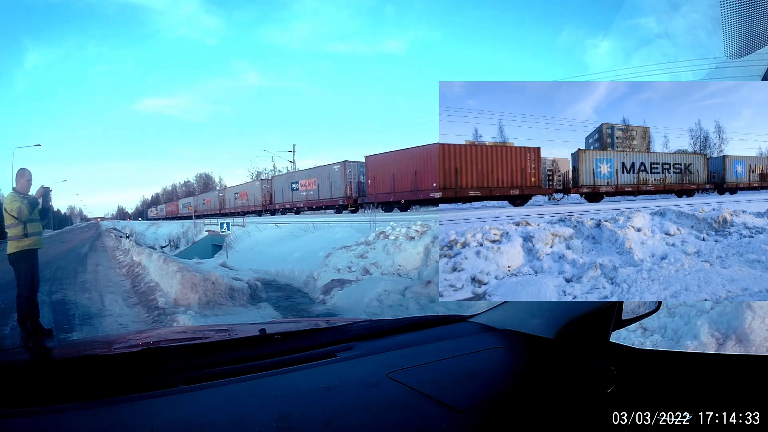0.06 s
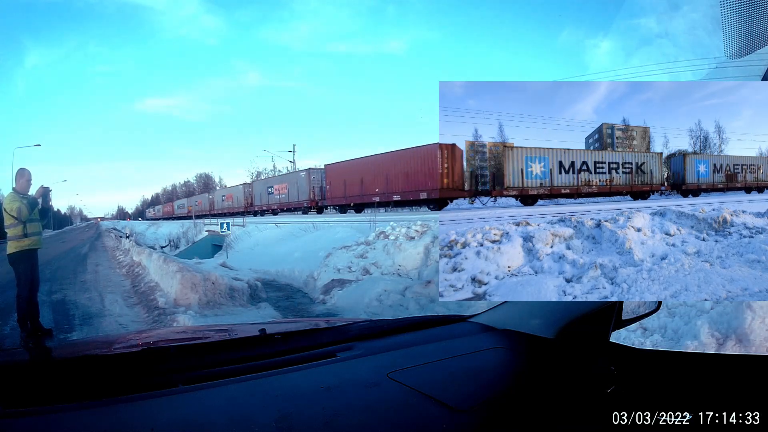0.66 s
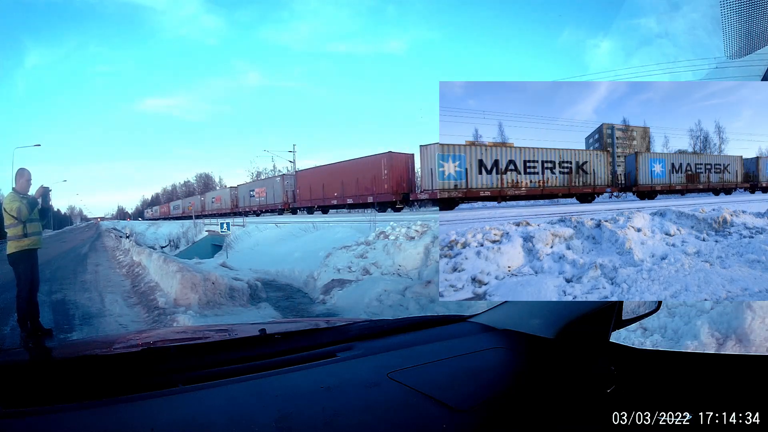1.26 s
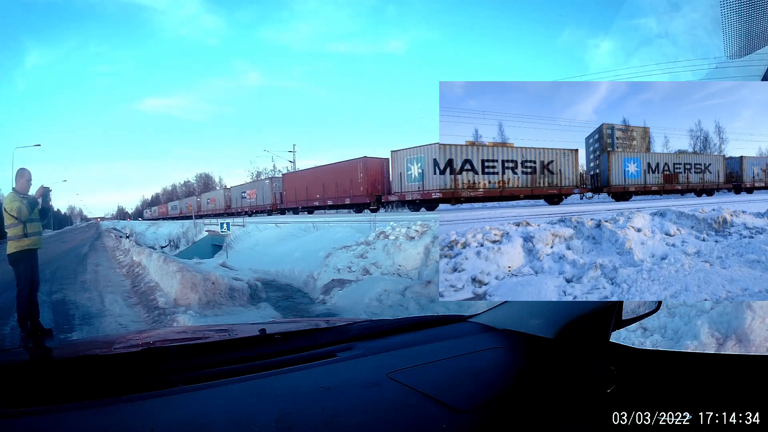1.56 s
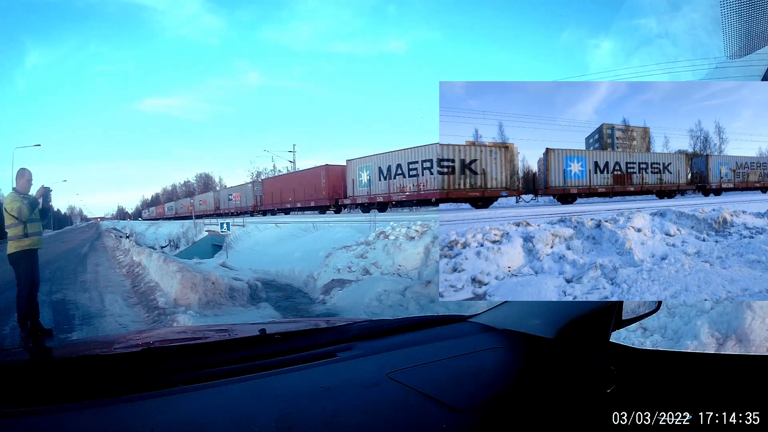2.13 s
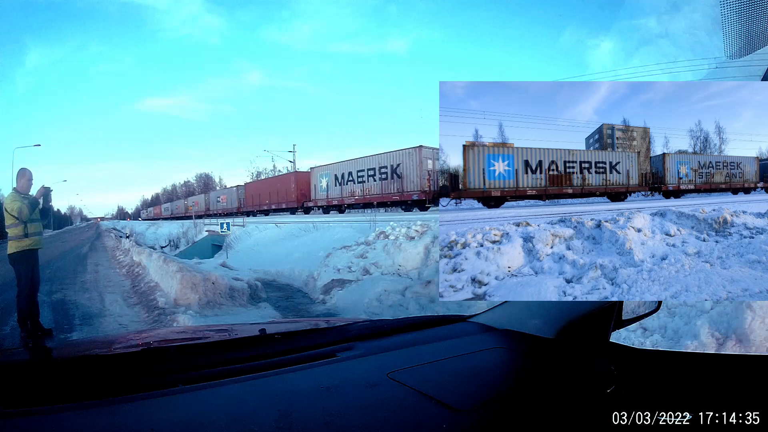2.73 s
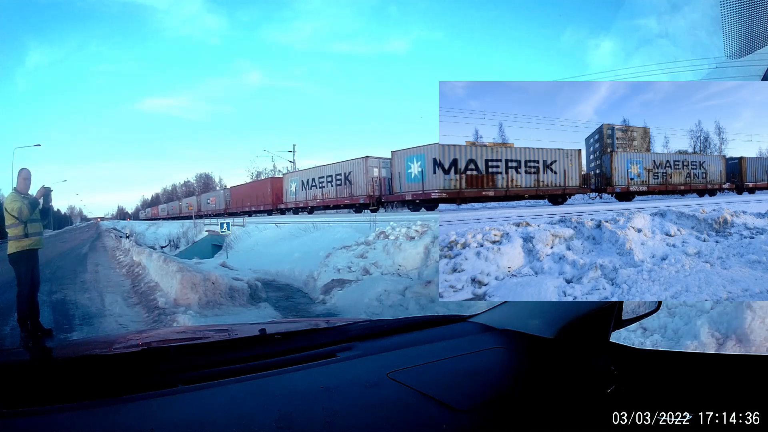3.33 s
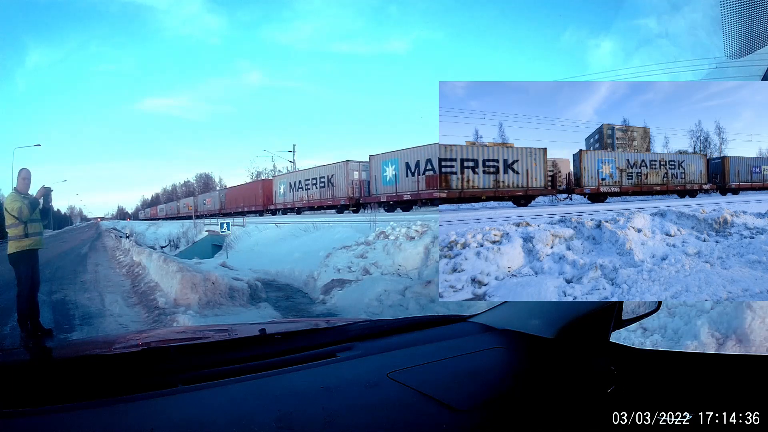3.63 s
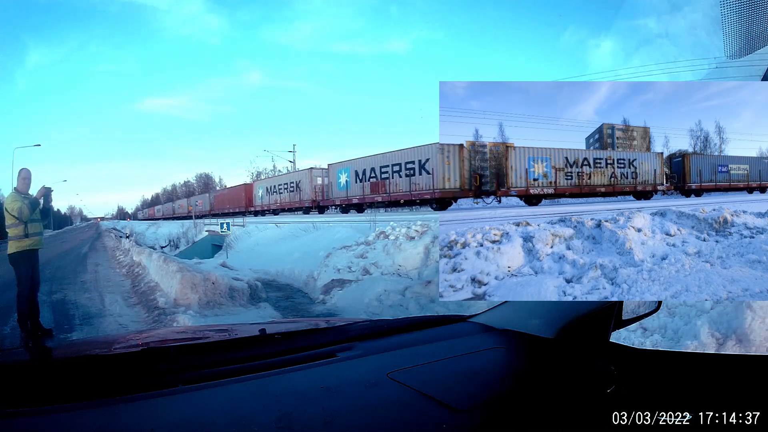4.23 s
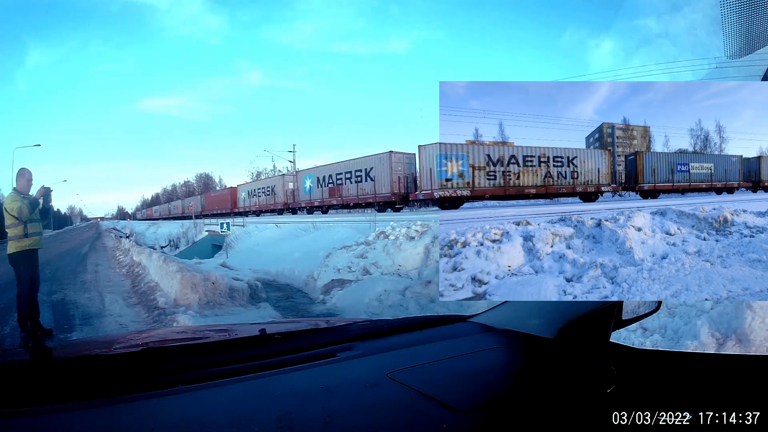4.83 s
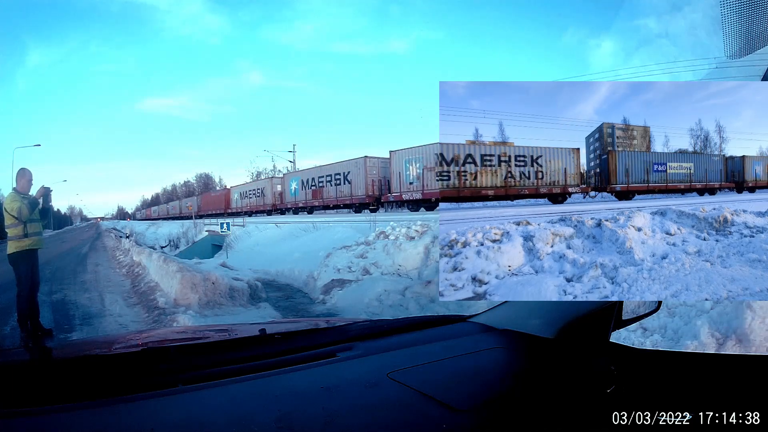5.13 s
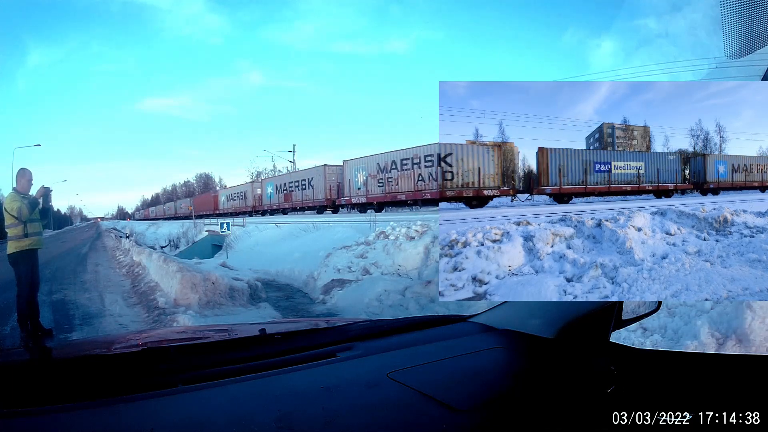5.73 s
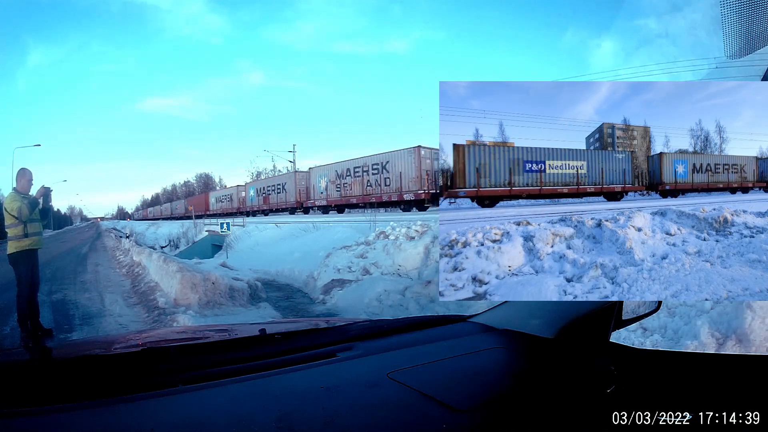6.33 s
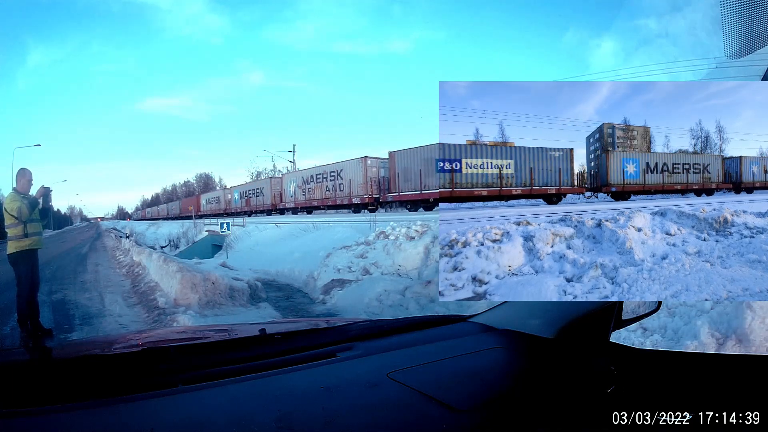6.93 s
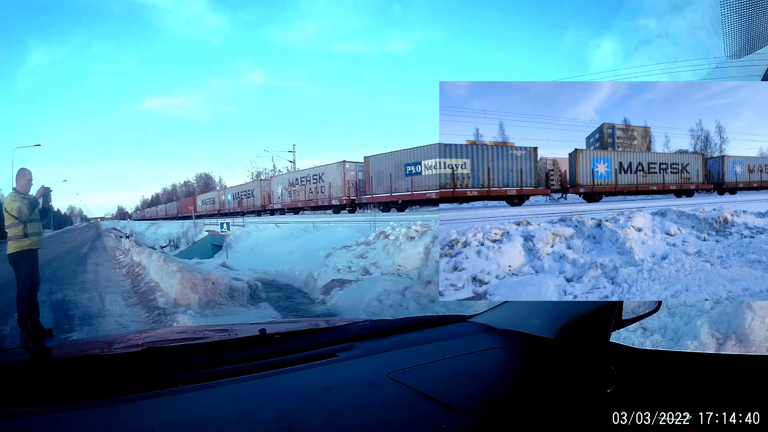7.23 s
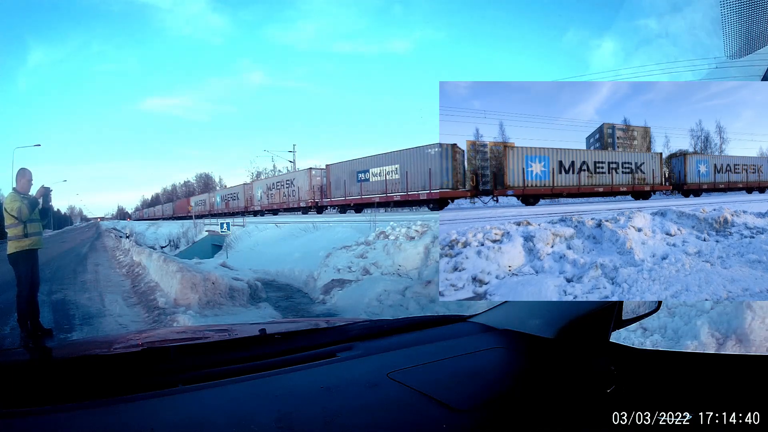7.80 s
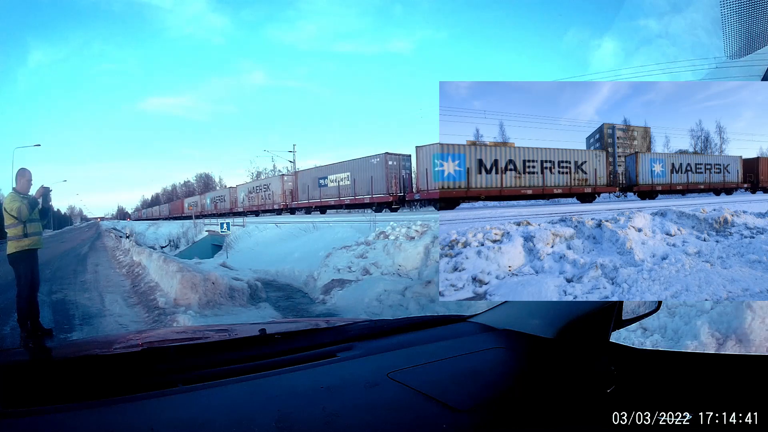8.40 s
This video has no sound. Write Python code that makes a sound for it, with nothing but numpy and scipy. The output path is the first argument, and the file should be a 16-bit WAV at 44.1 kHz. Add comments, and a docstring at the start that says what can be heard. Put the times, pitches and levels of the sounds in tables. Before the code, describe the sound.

Freight wagons rumble by, their wheels singing and squeaking on the rails and clacking twice at a time over a joint.

```python
"""At a snowy level crossing, heard from a waiting car, a long container train rolls steadily past.
Wagons rumble. Rough wheel treads set the rails and wheels ringing, and wheels sing as they pass.
The flanges (the lips that keep the wheels on the track) hiss and chirp against the rail.
Each bogie (a frame with two axles) clacks twice over a joint in the rail.
The two microphones differ strongly in tone."""
import sys
import numpy as np
from scipy import signal
from scipy.fft import rfft, irfft
from scipy.io import wavfile
from scipy.ndimage import uniform_filter1d

SR = 44100
rng = np.random.default_rng(int(sys.argv[2]) if len(sys.argv) > 2 else 0)


def generate_wav(sig):
    """Save sig (samples, or channels by samples) to the path in sys.argv[1] as 16-bit PCM at SR."""
    pcm = np.round(np.clip(np.atleast_2d(sig).T, -1, 1) * 32767).astype(np.int16)
    wavfile.write(sys.argv[1], SR, pcm)


N = 373086
TIME = np.arange(N) / SR
HZ = np.maximum(np.fft.rfftfreq(N, 1 / SR), 1)
WAGON_GAP_S, FIRST_WAGON_S = 1.786, -1.149   # time between wagons; arrival of the first

# Levels in all tables are relative: each source adds its own gain.
# tone of steel rolling on steel: f/Hz, level/dB
ROAR_SPECTRUM = [(480, -65), (680, -63.5), (860, -62.5), (1150, -67), (1500, -64.5), (1800, -64.5),
                 (2050, -66), (2550, -66), (2800, -66.5), (3600, -67.5), (4350, -62.5), (4800, -67.5),
                 (5600, -74.5)]
# tone of the dull part of a hit: f/Hz, level/dB
CLUNK_SPECTRUM = [(70, 29), (110, 12.5), (200, -12), (350, 1), (700, 5), (1200, -8)]
# tone of the bright, steely part of a hit: f/Hz, level/dB
CRASH_SPECTRUM = [(1200, -3), (2400, 8.5), (4300, 12.5), (5600, 7.5), (7300, 5.5), (8700, -2), (15500, -5)]
# bogies reaching the joint, two per wagon: t/s, crash/dB, clunk/dB, second axle's crash minus first's/dB
BOGIE_HITS = [(-0.035, -45, -29.5, -8), (0.64, -38, -31, -7.5), (1.749, -43.5, -33.5, -1.5),
              (2.428, -39, -37, -10), (3.531, -41, -33.5, -9), (4.217, -51, -35.5, -2),
              (5.31, -54, -35, -10), (6.003, -42, -42, -8), (7.102, -47, -34, -13), (7.781, -39.5, -43, -5)]
# how the two microphones relate: f/Hz, likeness (0 to 1), lead of the left/rad
MIC_PAIR = [(25, 0.98, .2), (60, 0.85, 0.61), (117, 0.99, 0.44), (249, 0.92, 0.51), (397, 0.55, 0.18),
            (500, 0.8, 2.52), (750, 0.41, 0.85), (1066, 0.63, 3.4), (1450, 0.57, 4.06), (1807, 0.58, 6.67),
            (2057, 0.24, 10.1), (2693, 0.56, 16.12), (3200, 0.25, 16), (3565, 0.26, 17.5),
            (4510, 0.08, 23.87)]


def from_db(db):
    """Turn decibels into a gain to multiply by."""
    return 10 ** (np.asarray(db) / 20)


def rms_one(x):
    """Scale a signal so that its average size (rms) is 1."""
    return x / np.sqrt(np.mean(x ** 2) + 1e-20)


def in_time(rows):
    """Join (time, value) points with straight lines, giving a value for every sample."""
    return np.interp(TIME, *np.transpose(rows))


def over_hz(rows):
    """Read each value column of a frequency table at every frequency."""
    hz, *columns = np.transpose(rows)
    return [np.interp(np.log(HZ), np.log(hz), column) for column in columns]


def band(low_hz, high_hz, order=8):
    """Gain that keeps the sound between two frequencies; a higher order cuts more steeply."""
    return 1 / np.sqrt((1 + (low_hz / HZ) ** (2 * order)) * (1 + (HZ / high_hz) ** (2 * order)))


def colour(spectrum):
    """Gain that follows a spectrum table and cuts off beyond its ends."""
    return from_db(over_hz(spectrum)[0]) * band(spectrum[0][0], spectrum[-1][0], order=12)


def resonance(hz, width_hz):
    """Gain of one mode (a pitch at which an object likes to ring), 1 at its peak."""
    return 1 / (1 + ((HZ - hz) / width_hz) ** 2)


def dense_modes(depth_db, spacing_hz):
    """Gain of a steel body with many close modes: small random peaks and dips."""
    grid = np.arange(0, SR, spacing_hz)
    return rms_one(from_db(depth_db * np.interp(HZ, grid, rng.standard_normal(len(grid)))))


def noise(gain):
    """Two unrelated noises with the same tone: one for direct sound, one for scattered sound."""
    return rms_one(irfft(rfft(rng.standard_normal((2, N))) * gain, N))


def drift(rate_hz):
    """A smooth random wobble of about plus or minus 1; a higher rate wobbles faster."""
    step, settle = 40, 2000
    pole = np.exp(-2 * np.pi * step * rate_hz / SR)
    white = rng.standard_normal(N // step + settle + 2)
    slow = signal.lfilter([1], [1, -2 * pole, pole * pole], white)[settle:]
    return np.interp(np.arange(N) / step, np.arange(len(slow)), rms_one(slow))


def steady(x, window_s):
    """Even out the slow swells of a noise."""
    return x / np.sqrt(uniform_filter1d(x ** 2, int(window_s * SR)) + 1e-9)


def bump(s, half_s):
    """A smooth swell of height 1 around the time s."""
    return np.exp(-np.minimum(((TIME - s) / half_s) ** 2, 100))


def blows(times, levels_db, rise_s, t60, tail_db, tail_t60):
    """Loudness curve of hits: a quick rise, a fall of 60 dB in t60 seconds, and a weaker tail."""
    power = np.zeros(N)
    for s, level_db in zip(times, levels_db):
        span = slice(max(int((s - .5) * SR), 0), int((s + 1) * SR))
        before, after = np.maximum(s - TIME[span], 0), np.maximum(TIME[span] - s, 0)
        fall = from_db(-60 * after / t60) + from_db(tail_db - 60 * after / tail_t60)
        power[span] += (from_db(level_db) * np.exp(-before / rise_s) * fall) ** 2
    return np.sqrt(power)


def wagon_rumble(at_joint, ground_db=0.5, frame_db=3.5, split_hz=85):
    """The ground shakes under the heavy axles; the wagon frames boom at a higher pitch."""
    # tone of the rumble: f/Hz, level/dB
    spectrum = [(10, -32.5), (20, -37.5), (38, -42), (48, -36), (60, -48), (72, -39.5), (85, -44),
                (115, -41.5), (140, -45.5), (180, -46), (230, -53), (310, -54), (480, -65)]
    # shaking of the ground under the changing load: t/s, level/dB
    ground_levels = [(0.0, -23.5), (1.41, -25), (2.26, -22), (2.54, -27), (2.96, -20.5), (3.38, -24.5),
                     (4.51, -20.5), (4.94, -23), (5.5, -20), (5.64, -24), (6.63, -21.5), (6.77, -25),
                     (7.47, -22), (7.76, -24.5), (8.18, -21), (8.46, -25)]
    # boom of the wagon frames: t/s, level/dB
    frame_levels = [(0.0, -27.5), (1.83, -29), (2.26, -27.5), (2.82, -27.5), (4.23, -29.5), (4.37, -26),
                    (4.65, -28.5), (7.76, -28.5), (7.9, -26), (8.46, -28.5)]
    ground = steady(noise(colour(spectrum) * band(1, split_hz)), window_s=0.214)
    frames = steady(noise(colour(spectrum) * band(split_hz, SR)), window_s=0.14)
    frame_gain = from_db(in_time(frame_levels) + frame_db + 1.5 * at_joint + 0.33 * drift(14))
    ground_gain = from_db(in_time(ground_levels) + ground_db + 0.5 * drift(6))
    return ground_gain * ground + frame_gain * frames


def wall_drone(loudest_db=-29.5, fade_db_per_s=3, lead_s=0.28):
    """Container walls throb, loudest just before each wagon reaches the joint, then fade until the next."""
    # low modes of the walls: f/Hz, width/Hz, level/dB
    wall_modes = [(104.6, 10.5, -5), (118.7, 11, 0), (162, 7.4, -9), (180.4, 9.9, -9)]
    since_s = uniform_filter1d((TIME - FIRST_WAGON_S + lead_s) % WAGON_GAP_S, SR // 8)
    gain = from_db(loudest_db - fade_db_per_s * since_s + drift(3.4))
    walls = sum(from_db(db) * resonance(hz, width_hz) for hz, width_hz, db in wall_modes)
    return gain * steady(noise(walls * band(79, 181)), window_s=0.24)


def rumble_swells(swell_db=1.5):
    """Brief low and low-mid swells in the train's rumble, each on one note; all of it is direct sound."""
    # swells in the rumble: t/s, f/Hz, level/dB, half length/s
    swells = [(0.029, 264, -33.5, 0.054), (0.63, 101.3, -19, 0.064), (0.67, 257, -31, .035),
              (0.74, 109, -19, 0.039), (2.302, 344, -38.5, 0.11), (1.49, 118, -21, 0.036),
              (2.1, 112, -23.5, .06), (2.41, 117.7, -20, 0.087), (2.51, 166, -26, 0.065),
              (2.78, 106, -25.5, 0.045), (3.03, 113.7, -27, 0.054), (3.19, 122, -24, 0.034),
              (3.37, 122.6, -20, 0.04), (4.005, 122, -22.5, 0.032), (4.15, 113.2, -25, 0.054),
              (4.23, 94.5, -23.5, 0.053), (4.38, 261, -31, 0.029), (4.4, 122, -25, 0.064),
              (4.599, 104.7, -28, .08), (4.81, 288, -29.5, .03), (4.99, 113, -24, 0.066),
              (5.29, 95, -27.5, .07), (5.351, 355, -33, 0.036), (5.8, 162, -25, 0.05),
              (5.92, 126, -25, .045), (6.02, 102, -18.5, 0.066), (6.07, 180, -28.5, .05),
              (6.45, 117.6, -23, 0.056), (6.61, 115.6, -20.5, 0.063), (7.1, 90, -21.5, .016),
              (7.51, 112, -23, 0.051), (7.68, 108, -20.5, 0.067), (7.951, 310, -32, .04),
              (8.08, 105, -25, 0.069), (8.26, 115, -27, 0.07), (8.32, 177, -26, 0.058)]
    out = np.zeros((2, N))
    for (s, hz, level_db, half_s), phase in zip(swells, rng.uniform(0, 2 * np.pi, len(swells))):
        span = np.abs(TIME - s) < 3 * half_s
        t = TIME[span] - s
        swell = from_db(level_db + swell_db) * np.exp(-(t / half_s) ** 2)
        out[0, span] += swell * np.sin(2 * np.pi * hz * t + phase)
    return out


def loose_rattles(rattle_db=5.0, rough_db=2.0, thump_db=7.5):
    """Couplings and container locks chatter and thump, in the same rhythm on every wagon."""
    # rattles of one wagon: t/s after it arrives, level/dB
    rhythm = [(0.3, -47), (0.4, -49), (0.665, -52.5), (0.945, -46.5), (1.25, -53.5), (1.36, -53)]
    # how loose each wagon's fittings are: extra level/dB
    looseness = [4, 3, -2.5, -3, 3, 1.5]
    times, levels_db = np.transpose([(FIRST_WAGON_S + wagon * WAGON_GAP_S + delay_s, db + loose_db)
                                     for wagon, loose_db in enumerate(looseness) for delay_s, db in rhythm])
    chatter = from_db(rough_db * drift(120)) * noise(colour(CRASH_SPECTRUM))
    thump = from_db(thump_db) * noise(colour(CLUNK_SPECTRUM))
    hits = blows(times, levels_db + rattle_db, rise_s=0.034, t60=0.32, tail_db=-20, tail_t60=.4)
    return hits * (chatter + thump)


def rolling_roar(at_joint, rail_db=4.0, wheel_db=3.0, split_hz=1450, top_hz=3700):
    """Rough treads shake the rails (low roar) and the wheels (bright roar); both swell with each bogie."""
    # roar of the rails: t/s, level/dB
    rail_levels = [(0.0, -39.5), (0.99, -37.5), (1.13, -38.5), (2.96, -38), (3.1, -39), (6.2, -38.5),
                   (6.35, -37.5), (7.76, -40), (7.9, -36.5), (8.46, -38.5)]
    # roar of the wheels, following the roughness of their treads: t/s, level/dB
    wheel_levels = [(0.0, -35), (0.99, -35), (2.96, -36), (3.81, -35), (3.95, -37), (5.64, -35), (6.2, -36),
                    (6.35, -32.5), (6.49, -36.5), (7.05, -34.5), (7.19, -35.5), (8.46, -35)]
    uneven_db = 0.48 * drift(6.1)
    rail_level = in_time(rail_levels) + rail_db + 2.5 * at_joint + uneven_db
    wheel_level = in_time(wheel_levels) + wheel_db + 2.1 * at_joint + uneven_db
    steel = colour(ROAR_SPECTRUM) * dense_modes(depth_db=1.73, spacing_hz=16)
    rails = from_db(rail_level + drift(31)) * noise(steel * band(1, split_hz))
    wheels = from_db(wheel_level + drift(29)) * noise(steel * band(split_hz, top_hz, order=12))
    return rails + wheels


def wheel_ring(ring_db=-2.5, swell_db=2.2):
    """Wheels ring at a few pitches, each swelling and fading a little as different wheels go by."""
    # narrow wheel modes: f/Hz, width/Hz, level/dB
    wheel_modes = [(1790, 85, -44.5), (2260, 50, -62), (2544, 70, -45), (3010, 40, -53), (3630, 30, -51),
                   (3860, 43, -62), (4300, 55, -47), (6170, 80, -61.5), (8000, 90, -86)]
    out = 0
    for hz, width_hz, level_db in wheel_modes:
        swell = from_db(swell_db * drift(5))
        out += from_db(level_db + ring_db) * rms_one(noise(resonance(hz, width_hz)) * swell)
    return out


def flange_hiss(at_joint, rub, hiss_db=1.0, grain_db=1.1):
    """Steel rubs on steel with a grainy hiss."""
    # tone of the hiss: f/Hz, level/dB
    spectrum = [(5600, -79), (6150, -78.5), (6500, -80), (7350, -80.5), (7800, -86), (8150, -84.5),
                (8600, -87.5), (11000, -90), (15500, -96)]
    # strength of the hiss: t/s, level/dB
    hiss_levels = [(0.0, -50.5), (3.81, -51), (3.95, -54), (4.51, -51), (4.79, -54.5), (4.94, -51.5),
                   (5.92, -52.5), (6.35, -53), (6.49, -53.5), (6.63, -51), (7.33, -51.5), (7.47, -52.5),
                   (7.9, -50), (8.46, -52)]
    gain = from_db(in_time(hiss_levels) + hiss_db + 3.5 * at_joint + rub + grain_db * drift(50))
    return gain * noise(colour(spectrum) * dense_modes(depth_db=1.5, spacing_hz=30))


def rim_scrape(at_joint, rub, ring_db=-0.5, rasp_db=-2.0, flare_db=3.5):
    """Rubbing rings nine close modes of the wheel rim, each flaring up by itself, over a smooth rasp."""
    # scrape of the flanges on the rail: t/s, level/dB
    scrape_levels = [(0.0, -39), (0.85, -41), (0.99, -37.5), (1.13, -44), (1.27, -39.5), (3.81, -40.5),
                     (3.95, -41.5), (4.37, -40), (5.02, -40.5), (5.15, -37), (5.32, -37.5), (5.42, -41),
                     (5.78, -40.5), (6.9, -38.5), (7.19, -39), (8.46, -39)]
    ring = 0
    for hz in np.geomspace(3720, 4520, 9):
        level_db = np.interp(hz, *np.transpose(ROAR_SPECTRUM)) + flare_db * drift(12)
        ring += from_db(level_db) * noise(resonance(hz, width_hz=60))
    rasp = noise(colour(ROAR_SPECTRUM) * band(4090, SR) * dense_modes(depth_db=1.4, spacing_hz=25.06))
    gain = from_db(in_time(scrape_levels) + 1.5 * at_joint + 1.7 * rub)
    return gain * (from_db(ring_db) * steady(ring, window_s=0.092) + from_db(rasp_db) * rasp)


def singing_wheels(waver_hz=12.03, sink_per_s=0.012):
    """A ringing wheel comes and goes; its note wavers and sinks a little as it passes."""
    # long wheel notes: t/s when loudest, f/Hz, width/Hz, level/dB, half length/s
    notes = [(0.05, 2470, 12, -40, .12), (1.251, 1775, 50, -41, .6), (1.0, 2170, 25, -47, .5),
             (1.201, 3634, 20, -46, 1.2), (2.35, 2465, 12, -42.5, .25), (2.68, 4290, 9, -40, .15),
             (3.45, 3070, 8.6, -42, .45), (3.5, 3620, 18, -47, .9), (4.2, 2570, 25, -45, .3),
             (4.3, 3890, 25, -44.5, .35), (5.45, 1820, 24, -41, .3), (5.5, 2400, 22, -44, .2),
             (5.5, 4130, 14, -44, .2), (5.8, 2484, 11, -42.5, .3), (6.101, 4070, 12, -43.5, .3),
             (6.45, 1817, 30, -43, .2), (6.848, 2395, 20, -44.5, .35), (7.05, 2540, 40, -42, .3),
             (7.55, 2670, 25, -40, .2)]
    out = np.zeros((2, N))
    waver = waver_hz * drift(8.9)
    for s, hz, width_hz, level_db, half_s in notes:
        span = np.abs(TIME - s) < 2 * half_s
        pitch_hz = hz * (1 - sink_per_s * (TIME[span] - s)) + waver[span]
        phase = 2 * np.pi * np.cumsum(pitch_hz) / SR
        # slow noise blurs the pure note into a narrow band
        pole = np.exp(-2 * np.pi * width_hz / SR)
        shimmer = rms_one(signal.lfilter([1], [1, -2 * pole, pole * pole], rng.standard_normal((2, 2, N))))
        note = shimmer[0][:, span] * np.cos(phase) + shimmer[1][:, span] * np.sin(phase)
        out[:, span] += from_db(level_db) * bump(s, half_s)[span] * note
    return out


def flange_chirps(chirp_db=3.0, wander_hz=21.4, flutter_db=4.0, rasp_hz=85, faint_half_s=0.024):
    """A flange sticks and slips for a moment, so one wheel mode gives a wavering, raspy squeak."""
    # clear squeaks: t/s, f/Hz, level/dB, half length/s, left minus right/dB
    clear_squeaks = [(0.09, 2240, -40, .03, 4), (0.21, 3950, -35, .028, 11), (0.33, 8100, -55, .025, 12),
                     (0.8, 6330, -55, .08, -4), (0.89, 6300, -46, .025, -6), (0.92, 4450, -36, .03, 7),
                     (0.93, 1760, -37, .025, 3), (0.98, 2174, -38, .04, 0), (1.025, 4385, -32.5, .028, 10),
                     (1.04, 2583, -38, 0.028, 9), (1.195, 1780, -33.5, .035, 1), (1.25, 2777, -38, .025, 2),
                     (1.277, 4650, -43, .031, 5), (1.275, 5040, -42.5, .035, 0),
                     (1.39, 2562, -42, 0.031, 10), (1.535, 8920, -55, .025, 14),
                     (1.58, 9060, -53, .025, 14), (1.6, 1750, -36, .037, 2), (1.63, 3962, -36, .025, 9),
                     (1.69, 1650, -40, 0.044, 1), (1.74, 5200, -41, .022, -3), (1.787, 4570, -36, .028, 3),
                     (2.08, 8225, -54, .025, 9), (2.355, 4565, -35, .022, 8), (2.35, 13650, -54, .03, 12),
                     (2.43, 2239, -39, .024, 7), (2.6, 2660, -39, .025, 1), (2.75, 8182, -57, .025, 15),
                     (3.12, 4310, -34, .024, 10), (3.13, 4180, -38, .03, 13), (3.51, 4306, -38, .032, 10),
                     (3.54, 4198, -40, .035, 9), (3.82, 4320, -36, .027, 14), (4.14, 7838, -55, .025, 13),
                     (4.21, 7838, -52, .022, 13), (4.35, 4420, -37, .025, 10), (4.35, 5383, -45.5, .02, -9),
                     (4.36, 8182, -54, .025, 12), (4.88, 8139, -56, .022, 16), (4.965, 8096, -53, .025, 16),
                     (5.1, 3750, -38.5, 0.033, 6), (5.17, 4230, -35.5, .03, 14),
                     (5.175, 4478, -39, .025, 10), (5.28, 1873, -39, .035, -2),
                     (5.28, 3750, -38.5, .034, 6), (5.3, 4330, -35, .04, 11), (5.33, 2470, -37, .023, 8),
                     (5.47, 3900, -38, .028, 8), (5.52, 3750, -39, .02, 6), (5.54, 8100, -56, .025, 15),
                     (5.61, 2230, -41, .028, 5), (5.62, 1780, -39, .035, 1), (5.95, 2370, -36.5, .035, 5),
                     (6.01, 4295, -36, .022, 6), (6.14, 4080, -38, .022, 3), (6.14, 5512, -48, .02, -10),
                     (6.155, 13800, -48, .026, 12), (6.31, 8010, -52.5, .02, 13),
                     (6.38, 4550, -36, .03, 10), (6.39, 7751, -55, .02, 5), (6.545, 4050, -35.5, .035, 0),
                     (6.68, 2153, -36, .025, 6), (6.78, 4000, -38, .03, 13), (6.93, 2362, -36, .035, 11),
                     (6.99, 8139, -55, .022, 6), (7.04, 4005, -33, .025, 5), (7.05, 2375, -33.5, .034, 13),
                     (7.06, 4300, -34, .029, 13), (7.06, 1800, -42, .04, 1), (7.085, 2560, -34, .031, 8),
                     (7.25, 8010, -56, .022, 15), (7.32, 8100, -53, .025, 22), (7.4, 2370, -29, .024, 13),
                     (7.405, 3990, -30.5, .028, 3), (7.42, 1785, -35.5, .031, 1),
                     (7.785, 4425, -34, .017, -1), (7.791, 2710, -33, .025, 1), (7.92, 4450, -33, .02, 3),
                     (7.92, 2460, -35, .025, 7), (8.03, 2360, -36, 0.054, 16), (8.16, 5167, -44, .022, -2),
                     (8.19, 1840, -34.5, .028, 3), (8.25, 4240, -34, .025, 11), (8.36, 1808, -41, .03, -1)]
    # modes that squeak faintly at random: f/Hz, level/dB, squeaks per second
    faint_modes = [(1780, -43, .55), (2420, -43, .55), (7300, -58, 1.5), (7900, -62, 1.5), (8200, -63, 2),
                   (8700, -66, 1)]
    # how raspy a squeak is: f/Hz, share of its power (0 to 1)
    rasp_shares = [(1800, 0.27), (2400, .4), (4200, 0.5), (5000, .25), (8000, .3), (13800, .05)]
    out = np.zeros((2, N))
    wander = wander_hz * drift(95)
    flutter = rms_one(from_db(flutter_db * np.array([drift(90), drift(90)])))
    rasp = np.array([drift(rasp_hz) + 1j * drift(rasp_hz) for _ in range(2)]) / np.sqrt(2)
    _, left_lead = over_hz(MIC_PAIR)
    faint_squeaks = [(s, hz, level_db, faint_half_s, 6)   # 6 dB louder on the left
                     for hz, level_db, per_s in faint_modes for s in TIME[rng.random(N) < per_s / SR]]
    for s, hz, level_db, half_s, pan_db in list(clear_squeaks) + faint_squeaks:
        span = np.flatnonzero(np.abs(TIME - s) < 3 * half_s)
        own = (span + int(rng.random() * N)) % N   # each squeak takes its own stretch of the wobbles
        swell = np.exp(-((TIME[span] - s) / half_s) ** 2)
        share = np.clip(np.interp(hz, *np.transpose(rasp_shares)), 0, 1)
        grip = np.sqrt(1 - share) * flutter[:, own] + np.sqrt(share) * rasp[:, own]
        grip /= np.sqrt(np.average(np.abs(grip) ** 2, axis=1, weights=swell ** 2))[:, None]
        lag = np.array([[0], [np.interp(hz, HZ, left_lead)]])
        phase = 2 * np.pi * np.cumsum(hz + wander[own]) / SR - lag
        pan = rms_one(from_db([[pan_db], [0]]))
        out[:, span] += from_db(level_db + chirp_db) * pan * swell * np.imag(grip * np.exp(1j * phase))
    return out


def joint_clacks(crash_db=6.5, ring_db=7.0, clunk_db=10.0, knock_db=3.0, rough_db=3.5, axle_gap_s=0.1326):
    """Each axle hits the joint with a rough crash, a short ring of the rail, a dull clunk and a knock."""
    # rail modes set ringing at the joint: f/Hz, width/Hz, level/dB
    rail_modes = [(2700, 60, 12), (4340, 150, 7.5), (5120, 90, 6.5), (6150, 40, 12.5), (6670, 50, 9.5),
                  (7100, 40, 10), (7450, 48, 7.5), (8100, 50, 3)]
    # tone of the hard knock as a wheel lands: f/Hz, level/dB
    knock_spectrum = [(300, -2), (650, 3), (1100, -2), (1800, 0), (2900, -1), (4500, -8), (7500, -10)]
    first_axles = [(s, bright, dull) for s, bright, dull, _ in BOGIE_HITS]
    # the second axle lands more softly
    second_axles = [(s + axle_gap_s, bright + softer, dull - 8) for s, bright, dull, softer in BOGIE_HITS]
    times, bright_db, dull_db = np.transpose(first_axles + second_axles)
    crash = blows(times, bright_db + crash_db, rise_s=0.02, t60=0.084, tail_db=-24, tail_t60=.35)
    crash *= from_db(rough_db * drift(150))
    ring = blows(times, bright_db + ring_db, rise_s=0.0097, t60=0.1, tail_db=-27, tail_t60=.4)
    clunk = blows(times, dull_db + clunk_db, rise_s=0.018, t60=0.33, tail_db=-22, tail_t60=.35)
    knock = blows(times, bright_db + knock_db, rise_s=.004, t60=.07, tail_db=-24, tail_t60=.2)
    rail = sum(from_db(db) * resonance(hz, width_hz) for hz, width_hz, db in rail_modes)
    return (crash * noise(colour(CRASH_SPECTRUM) * dense_modes(depth_db=2.0, spacing_hz=49.6))
            + ring * noise(rail)
            + clunk * noise(colour(CLUNK_SPECTRUM))
            + knock * noise(colour(knock_spectrum)))


def microphones(sound):
    """Mix direct and scattered sound into left and right: alike in the bass, different in the treble."""
    # balance of the microphones: f/Hz, left minus right/dB
    balance = [(15, -0.5), (70, 2.5), (300, 7), (450, 0.5), (600, 11.5), (1050, 5.5), (1780, 0.5),
               (2350, 7.5), (2950, 0.5), (4400, 8.5), (5900, -8), (7400, 2), (8700, 12.5), (15000, 14)]
    direct, scattered = rfft(sound)
    likeness, left_lead = over_hz(MIC_PAIR)
    likeness = np.clip(likeness, 0, 1)
    sides = np.sqrt((1 + likeness) / 2) * direct + np.sqrt((1 - likeness) / 2) * scattered * [[1], [-1]]
    ratio = from_db(over_hz(balance)[0])
    gains = np.array([ratio, np.exp(-1j * left_lead)]) * np.sqrt(2 / (1 + ratio ** 2))
    return irfft(sides * gains, N)


def scene():
    """The whole train at the two microphones."""
    at_joint = sum(bump(s, half_s=0.051) for s, *_ in BOGIE_HITS)   # 1 as a bogie hits, 0 in between
    rub = drift(8.5)   # the flanges press unevenly on the rail
    wheels = rolling_roar(at_joint) + wheel_ring() + singing_wheels()
    rubbing = rim_scrape(at_joint, rub) + flange_hiss(at_joint, rub)
    wagons = wagon_rumble(at_joint) + wall_drone() + rumble_swells()
    return microphones(wagons + wheels + rubbing + joint_clacks() + loose_rattles()) + flange_chirps()


def record(dry):
    """Fade in and out over 3 milliseconds and cut off the highest treble steeply."""
    fade = np.clip(np.minimum(TIME, TIME[-1] - TIME) / 0.003, 0, 1)
    return irfft(rfft(dry * fade) * band(1, high_hz=15750, order=400), N)


dry = scene()
out = record(dry)
generate_wav(out)
```